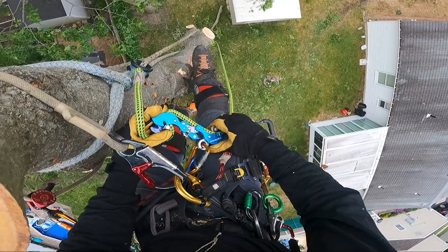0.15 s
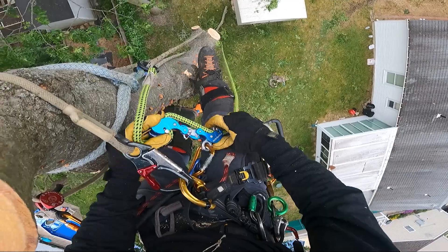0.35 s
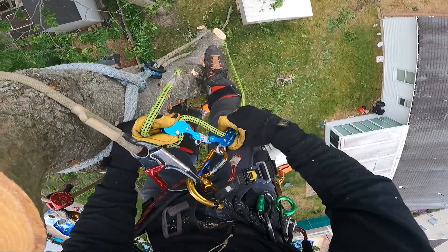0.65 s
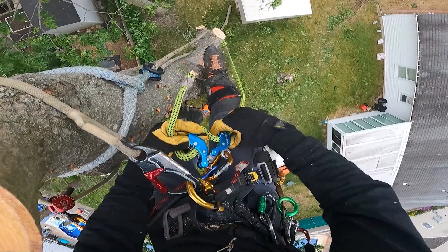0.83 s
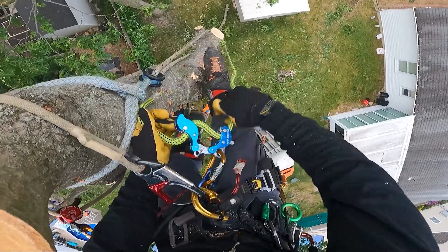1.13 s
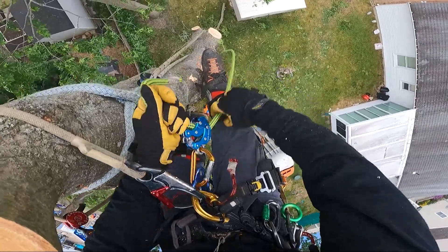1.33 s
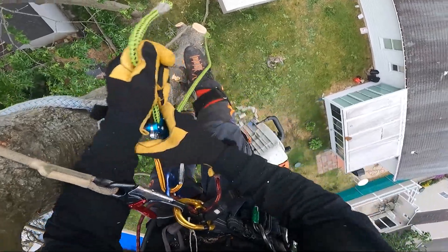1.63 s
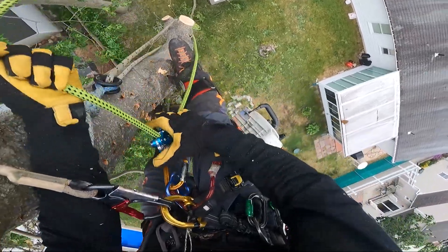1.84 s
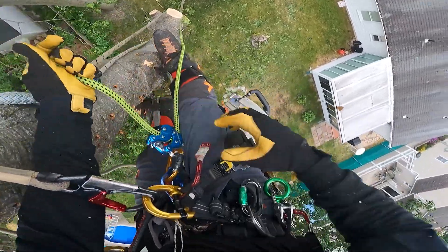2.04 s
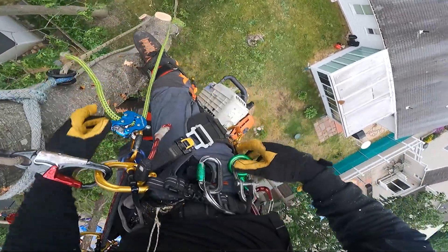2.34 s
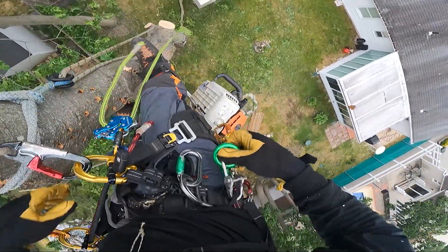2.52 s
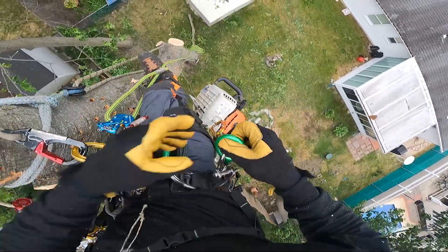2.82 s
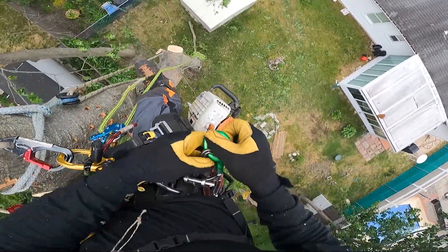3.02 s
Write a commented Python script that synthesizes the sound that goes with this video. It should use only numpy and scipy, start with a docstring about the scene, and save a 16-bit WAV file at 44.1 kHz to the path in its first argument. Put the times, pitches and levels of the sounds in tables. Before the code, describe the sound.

Metal climbing gear clicks and snaps, rope scrapes through, over distant engine roar and wind rumble.

```python
"""A metal rope device is handled high in a tree, snapped shut and has rope hauled through it; then
carabiners clink. Metal: coloured noise bursts plus decaying modes. Rope: grainy noise, rasp and hiss.
Behind: an engine on the ground (noise roar, firing and rotor tones) and wind rumble on the body-worn
microphone (low noise in gusts). A limiter ducks on loud treble."""
import sys
import numpy as np
from scipy import signal
from scipy.fft import rfft, irfft
from scipy.io import wavfile
from scipy.ndimage import uniform_filter1d

SR = 44100
rng = np.random.default_rng(int(sys.argv[2]) if len(sys.argv) > 2 else 0)


def persist_wave(psi):
    """Save psi, clipped to +-1, as 16-bit WAV."""
    counts = np.round(np.clip(psi, -1, 1) * 32767).astype(np.int16)
    wavfile.write(sys.argv[1], SR, np.atleast_2d(counts).T)


N = 139797
T = np.arange(N) / SR
LEAD_S = .05  # start of a metal sound's buffer to its peak
T_HIT = np.arange(SR // 4) / SR - LEAD_S
STRIKE_SPREAD_DB = 2.5  # the place struck varies each mode from hit to hit


def amp(db):
    """Decibels to gain."""
    return 10 ** (np.asarray(db) / 20)


def unit(x):
    """Scales to rms 1."""
    return x / np.sqrt(np.mean(x ** 2) + 1e-20)


def curve(rows):
    """Second column of a time table, interpolated at every sample."""
    rows = np.array(rows)
    return np.interp(T, rows[:, 0], rows[:, 1])


def colour(x, points, tilt_db_per_octave=0):
    """Filters by a spectrum, tilted about its peak (held from one octave below it down); rms 1."""
    f_hz, db = np.transpose(points)
    octave = np.log2(np.fft.rfftfreq(len(x), 1 / SR) + 1)
    from_peak = np.maximum(octave - np.log2(f_hz[np.argmax(db)]), -1)
    gain_db = np.interp(octave, np.log2(f_hz + 1), db) + tilt_db_per_octave * from_peak
    return unit(irfft(rfft(x) * amp(gain_db), len(x)))


def lowpass(x, hz):
    """Smooth split: what lies below hz."""
    return irfft(rfft(x) / (1 + (np.fft.rfftfreq(N, 1 / SR) / hz) ** 4), N)


def highpass(x, hz):
    """Smooth split: what lies above hz."""
    return x - lowpass(x, hz)


def drift(hz):
    """Slow random wander below hz, rms 1."""
    return unit(lowpass(rng.standard_normal(N), hz))


def add(mix, peak_s, sound):
    """Mixes in a metal sound, its peak at peak_s."""
    part = mix[max(round((peak_s - LEAD_S) * SR), 0):][:len(sound)]
    part += sound[:len(part)]


def mic_hiss(level_db=-70):
    """Faint self-noise of the microphones: steady coloured noise."""
    # hiss spectrum: f/Hz, level/dB
    hiss_spectrum = [(100, -13), (2000, -4.5), (4500, 13), (8000, -4), (12800, -12), (14000, -22),
                     (16000, -36)]
    return amp(level_db) * colour(rng.standard_normal(N), hiss_spectrum)


def wind(lump_db=2, lump_hz=14):
    """Lumpy buffeting on the microphone: low noise, randomly modulated, in gusts."""
    # buffeting spectrum: f/Hz, level/dB
    wind_spectrum = [(10, -8), (25, 0.5), (50, 2.5), (80, 2.5), (120, -2), (200, -6.5), (400, -28.5),
                     (1200, -71)]
    # gust level: t/s, level/dB
    gusts = [(.06, -26), (.16, -19.5), (.28, -24), (.44, -22), (.7, -22), (.9, -29.5), (1.08, -21),
             (1.45, -27.5), (1.9, -36.5), (2.3, -31), (2.52, -24), (2.65, -17), (2.9, -20.5), (3.17, -22)]
    rumble = colour(rng.standard_normal(N), wind_spectrum)
    return amp(curve(gusts)) * unit(rumble * amp(lump_db * drift(lump_hz)))


def tone(hz, flutter_db=2, flutter_hz=4):
    """One engine line of rms 1, fluttering on its way through the air."""
    flutter = unit(amp(flutter_db * drift(flutter_hz)))
    cycles = np.cumsum(hz) / SR + rng.random()
    return np.sqrt(2) * flutter * np.sin(2 * np.pi * cycles)


def roar(swell_db=0.61, swell_hz=25):
    """Broadband engine noise, crossfading between two spectra as the climber turns."""
    # roar spectrum: f/Hz, level before turn/dB, level after turn/dB
    roar_spectra = [(60, -17, -1.5), (106, -2.5, -1), (220, -2.5, -2.5), (424, -5.5, -3.5),
                    (500, -6.5, -11), (645, -8.5, -4), (856, -9.5, -9.5), (1016, -6.5, -9.5),
                    (1270, -15, -14.5), (1290, -13, -14), (2174, -14.5, -19.5), (2600, -23.5, -26.5),
                    (3380, -25, -34.5), (3670, -37, -32), (6700, -38, -38.5), (8650, -48, -45.5),
                    (10700, -62, -56), (15000, -79, -70)]
    # roar level: t/s, level/dB
    roar_level = [(.06, -23), (.6, -22), (1.1, -22), (1.5, -22.5), (1.9, -21.5), (2.4, -25.5), (2.7, -23),
                  (3.17, -23.5)]
    # climber's turn: start t/s, end t/s
    turn_s = (0.68, 1.68)
    turned = np.interp(T, turn_s, (0, 1))
    noise = rng.standard_normal(N)
    before = colour(noise, [(hz, db) for hz, db, _ in roar_spectra])
    after = colour(noise, [(hz, db) for hz, _, db in roar_spectra])
    return (before + turned * (after - before)) * amp(curve(roar_level) + swell_db * drift(swell_hz))


def firing(rate_hz=35.77, waver_share=0.00327, waver_hz=4.9):
    """Engine firing: multiples of one wavering rate."""
    # firing tones, before the level curve: multiple of rate, level/dB rms
    firing_orders = [(2, -30.5), (4, -37), (5, -40.5), (6, -31.5), (7, -36.5), (8, -41.5), (10, -41.5),
                     (11, -44), (25, -49), (49, -50.5)]
    # gain on all firing tones: t/s, level/dB
    firing_level = [(.3, 0.5), (1.3, -.5), (1.9, 1.5), (2.35, -3.5), (2.75, -.5), (3.17, -2.5)]
    hz = rate_hz * (1 + waver_share * drift(waver_hz))
    return amp(curve(firing_level)) * sum(amp(db) * tone(k * hz) for k, db in firing_orders)


def rotor(pitch_hz=337.4, waver_share=0.0017, waver_hz=5.2):
    """Engine-driven rotor: wavering harmonics whose levels shift as the climber moves."""
    # times of the rotor levels: t/s
    rotor_times_s = (.6, 1.8, 2.45, 2.9)
    # rotor tones: multiple of pitch, then level/dB rms at each of those times
    rotor_orders = [(1, -30.5, -30, -33, -27.5), (2, -39.5, -31.5, -39.5, -39),
                    (3, -39, -42.5, -44.5, -42.5), (4, -39.5, -46.5, -51, -52)]
    hz = pitch_hz * (1 + waver_share * drift(waver_hz))
    return sum(amp(np.interp(T, rotor_times_s, dbs)) * tone(k * hz) for k, *dbs in rotor_orders)


def engine():
    """Distant engine: broadband roar, firing tones and rotor tones."""
    return roar() + firing() + rotor()


def burst(db, rise_s, fall_s, points, tilt_db_per_octave=0):
    """Brief scrape: coloured noise, exponential rise to the peak and fall after it."""
    rate = np.where(T_HIT < 0, T_HIT / max(rise_s, 1e-4), -T_HIT / max(fall_s, 1e-4))
    shape = np.exp(rate)
    noise = colour(shape * rng.standard_normal(len(T_HIT)), points, tilt_db_per_octave)
    return amp(db) * noise * np.sqrt(np.mean(shape ** 2))


def ringing(rise_s, modes, phase_cycles):
    """Sine modes that swell up to time zero and die away, each at its own t60."""
    ring = np.zeros(len(T_HIT))
    for (hz, db, t60_s), phase in zip(modes, phase_cycles):
        decay = amp(db - 60 * np.maximum(T_HIT, 0) / t60_s)
        ring += decay * np.sin(2 * np.pi * (hz * T_HIT + phase))
    return np.exp(np.minimum(T_HIT, 0) / max(rise_s, 1e-4)) * ring


def contact(db, scrape_s, rattle_s, ring_db, tilt_db_per_octave, clack, modes):
    """Metal scrapes up to a hit, rattles briefly and rings."""
    ring = ringing(scrape_s, modes, rng.random(len(modes)))
    scrape = burst(db, scrape_s, rattle_s, clack, tilt_db_per_octave)
    return scrape + amp(db + ring_db) * ring / np.sqrt(2)


def carabiners(detune_share=0.0043):
    """Carabiner clinks: short clack plus modes scaled to a ring pitch; a hand on it shifts each a little."""
    # contacts: t/s, level/dB, scrape/s, rattle/s, ring re level/dB, tilt/(dB/octave), ring pitch f/Hz
    clinks = [(2.510, -43, .002, .004, -21, -3, 8560), (2.570, -33, .002, .004, -10, 2, 8560),
              (2.6245, -29.5, 0.0013, .002, -21.5, 6.5, 8560), (2.650, -35, .004, .003, -16, 1, 7980),
              (2.660, -30, .002, .003, -20, -1, 7980), (2.713, -28.5, .0015, .003, -22, -1, 7980),
              (2.800, -43, .002, .003, -16, -2, 7980), (2.815, -30.5, .001, .003, -22, 0, 7980),
              (2.940, -38, .001, .003, -4, -1, 7980), (2.972, -30, .002, .002, -4, -2, 7800),
              (2.977, -25.5, .001, .002, -0.5, 2, 7980), (2.9855, -28.5, 0.0027, .004, -2, 4, 7980),
              (3.046, -29.5, .0007, .002, -14, 0, 7600), (3.0775, -27, .0005, .0012, -22, -3, 7980),
              (3.083, -28, .0005, .002, -14, -2, 7980), (3.094, -27, .0005, .0012, -19, -2, 7800),
              (3.1025, -27.5, .0005, .0012, -22, -1, 7980)]
    # ring modes: share of ring pitch, level/dB, t60/s
    clink_modes = [(.49, -12, .025), (.576, -16, .03), (.743, -3, 0.038), (.86, -11, .03), (.945, -4, .025),
                   (1, 0.5, 0.093), (1.014, -9, .04), (1.19, -9, .028), (1.49, -20, .04),
                   (1.535, -22, .035)]
    # clack spectrum: f/Hz, level/dB
    clink_clack = [(500, -20), (2000, 0.5), (4000, 8.5), (6500, -2.5), (9000, -11.5), (12000, -22.5),
                   (16000, -38)]
    out = np.zeros(N)
    for s, *hit, pitch_hz in clinks:
        modes = []
        for share, db, t60_s in clink_modes:
            hz = share * pitch_hz * (1 + detune_share * rng.normal())
            modes.append((hz, db + STRIKE_SPREAD_DB * rng.normal(), t60_s))
        add(out, s, contact(*hit, clink_clack, modes))
    return out


def friction(fibres_per_s=2500, spread_db=3, fibre_share=0.46):
    """Fibres catch and let go: random impulses (by power share) over a smooth noise rub."""
    slipping = rng.random(N) < fibres_per_s / SR
    size = amp(spread_db * np.minimum(rng.exponential(1, N), 4))
    slips = slipping * size * rng.choice([-1, 1], N)
    return np.sqrt(fibre_share) * unit(slips) + np.sqrt(1 - fibre_share) * rng.standard_normal(N)


def rope_rasp(catch_db=1.3, catch_hz=200):
    """Haul rasp: mid-band friction noise; the strands catch unevenly."""
    # rasp level: t/s, level/dB
    haul = [(1.74, -71), (1.79, -34), (1.825, -22), (1.86, -18.5), (1.93, -21), (2.0, -20.5), (2.08, -21.8),
            (2.16, -26), (2.25, -31), (2.42, -38.5)]
    # rasp spectrum: f/Hz, level/dB
    rasp_spectrum = [(200, -7.5), (520, -27), (700, -1), (830, -8.5), (980, -4), (1150, -7.5), (1400, -2),
                     (1580, -6), (1800, -3.5), (2050, -11), (2450, -11), (3000, -17.5), (5000, -62)]
    catch = unit(amp(catch_db * drift(catch_hz)))
    return amp(curve(haul)) * colour(friction(), rasp_spectrum) * catch


def rope_hiss(judder_db=0.8, judder_hz=140, bright_hz=6000, bright_db_per_db=1):
    """Juddering hiss of sheath and gloves: friction noise whose treble falls further as the level falls."""
    # hiss level: t/s, level/dB
    sheath = [(1.72, -42.5), (1.79, -38.5), (1.83, -29), (1.885, -27), (1.93, -28), (1.99, -25.5),
              (2.07, -29), (2.17, -32), (2.28, -38.5), (2.47, -43.5), (2.65, -44), (2.88, -42.5),
              (3.15, -40)]
    # hiss spectrum: f/Hz, level/dB
    sheath_spectrum = [(1200, -22), (2500, -12.5), (3300, -5), (4300, -2.5), (5300, -4), (6500, -11),
                       (8500, -18.5), (10500, -34), (13000, -34.5), (14500, -45), (16000, -62)]
    judder = amp(judder_db * drift(judder_hz))
    level_db = curve(sheath)
    hiss = colour(friction(), sheath_spectrum)
    dull = lowpass(hiss, bright_hz)
    treble = (hiss - dull) * amp(bright_db_per_db * (level_db - level_db.max()))
    return amp(level_db) * judder * (dull + treble)


def jostles():
    """Rope jostles the device: noise scrapes, spectrum scaled to a pitch."""
    # scrapes: t/s, level/dB, rise/s, fall/s, pitch f/Hz
    scrapes = [(1.886, -23.5, .004, .008, 4900), (1.969, -23, .0007, .002, 5000),
               (1.992, -22, .001, .002, 4900), (2.099, -18, .002, .003, 4200),
               (2.118, -28, .008, .012, 4300), (2.207, -29.5, .0044, .012, 4200),
               (2.351, -32.5, 0.01, 0.022, 4100)]
    # scrape spectrum: share of pitch, level/dB
    scrape_spectrum = [(.49, -28), (.88, -10), (1, 6.5), (1.085, 5), (1.17, -1), (1.29, -1.5), (1.51, -22),
                       (2.44, -46), (3.9, -55)]
    out = np.zeros(N)
    for s, *scrape, pitch_hz in scrapes:
        add(out, s, burst(*scrape, [(share * pitch_hz, db) for share, db in scrape_spectrum]))
    return out


def snaps():
    """Device snaps shut, later the gear snaps taut: short-lived modes, each with a burst of grit."""
    # grit: t/s, level/dB, scrape/s, rattle/s, tilt/(dB/octave)
    grit = [(1.3124, -5.5, 0.00014, 0.00061, 0), (1.7, -21, .0019, .0018, -1)]
    # grit spectrum: f/Hz, level/dB
    grit_spectrum = [(500, -34), (2000, -16), (3500, -1), (5800, -2), (9000, -9.5), (12000, -17),
                     (16000, -32)]
    # device shuts: t/s, level/dB, rise/s
    shut = (1.3125, -5, .0002)
    # shut modes: f/Hz, level/dB, t60/s
    shut_modes = [(3050, -2, 0.0056), (3480, 1, .006), (4060, 1, .006), (4750, -5, .004), (5600, -4, .004),
                  (6500, -4, .005), (8700, -9, .004), (10800, -12, 0.0065)]
    # gear goes taut: t/s, level/dB, rise/s
    taut = (1.7003, -24.5, .0013)
    # taut modes: f/Hz, level/dB, t60/s
    taut_modes = [(2150, 1, .012), (2650, -4, .008), (3020, 3, .018), (3480, -1, .011), (4870, -8, .012),
                  (5640, 3, 0.018), (6300, -8, .012), (7450, -11, .014), (8400, -10, .012),
                  (11300, -15, .014), (12700, -20, .012)]
    out = np.zeros(N)
    for s, *snap, tilt in grit:
        add(out, s, burst(*snap, grit_spectrum, tilt))
    s, db, rise_s = shut
    add(out, s, amp(db) * ringing(rise_s, shut_modes, np.zeros(len(shut_modes))))  # one blow: in phase
    s, db, rise_s = taut
    add(out, s, amp(db) * ringing(rise_s, taut_modes, rng.random(len(taut_modes))))
    return out


def favour(hz, favoured_hz, boost_db=7.5, reach_octaves=0.1):
    """Boost in dB of a mode near the pitch that the place struck favours."""
    return boost_db * np.exp(-(np.log2(hz / favoured_hz) / reach_octaves) ** 2)


def rope_device(detune_share=.012):
    """Handled device: clacks plus ringing plates; grip and place struck vary each mode per hit."""
    # contacts: t/s, level/dB, scrape/s, rattle/s, ring re level/dB, tilt/(dB/octave), favoured f/Hz
    device_hits = [(.8975, -38, .0034, .003, 0, -2, 4500), (.9075, -23.5, .0012, .0018, -3, -2, 4800),
                   (.9800, -22, .0014, 0.002, -5.5, 1, 5450), (1.051, -36, .001, .002, -18, 1, 5400),
                   (1.0862, -26, 0.0022, 0.0026, -1, 0, 4600), (1.115, -45, .003, .005, 4, -4, 4950),
                   (1.2205, -30.5, .001, 0.002, -1, -7, 5050), (1.248, -36.5, .0022, .003, -9, -2, 4900),
                   (1.298, -21, 0.0018, .0025, -13, 4, 4150), (1.3096, -21.5, 0.0059, 0.0022, -12, 0, 6300),
                   (1.317, -16.5, 0.0022, 0.0032, -14, 4, 3900), (1.327, -26, .0013, 0.0085, -10, -3, 4000),
                   (1.351, -27, .001, .0023, -8, -4, 5100), (1.365, -32.5, .001, .004, 1.5, -7, 5000)]
    # plate modes: f/Hz, level/dB, t60/s
    plate_modes = [(3930, -14, .025), (4240, -3, .025), (4680, 2, .025), (4930, -1.5, .04), (5140, -6, .07),
                   (5400, -7, .025), (5950, -14, .03), (6500, -16, .02), (7600, -13, .03),
                   (9720, -19, 0.049)]
    # clack spectrum: f/Hz, level/dB
    device_clack = [(300, -30), (1500, -25), (3000, -2), (4700, 5), (7000, -4), (9000, -15.5), (12000, -22),
                    (16000, -44)]
    out = np.zeros(N)
    for s, *hit, favoured_hz in device_hits:
        modes = []
        for hz, db, t60_s in plate_modes:
            mode_db = db + favour(hz, favoured_hz) + STRIKE_SPREAD_DB * rng.normal()
            modes.append((hz * (1 + detune_share * rng.normal()), mode_db, t60_s))
        add(out, s, contact(*hit, device_clack, modes))
    return out


def scene(side_db=-14, side_hz=6000, top_db=-3, top_hz=11000):
    """Nearly mono; only the treble of the close sounds and the microphones' hiss differ between ears."""
    near = carabiners() + rope_rasp() + rope_hiss() + jostles() + snaps() + rope_device()
    top = highpass(highpass(near, top_hz), top_hz)
    spread = amp(side_db) * highpass(near, side_hz) + amp(top_db) * top
    side = signal.hilbert(spread).imag + mic_hiss()  # spread turned by 90 degrees
    mid = near + engine() + wind()
    return np.array([mid + side, mid - side])


def record(dry, threshold_db=-12, recover_db_per_s=120, sense_hz=2500, bass_hz=450, bass_share=0.38,
           start_s=.057, edge_hz=15500):
    """Treble-sensing limiter: ducks at once, bass less, recovers linearly in dB; silent start, band limit."""
    power = abs(uniform_filter1d(highpass(dry.mean(0), sense_hz) ** 2, size=24))
    fall_db = T * recover_db_per_s
    held_db = np.maximum.accumulate(10 * np.log10(power + 1e-12) + fall_db) - fall_db
    duck_db = uniform_filter1d(np.maximum(held_db - threshold_db, 0), size=16)
    bass = lowpass(dry, bass_hz)
    out = (dry - bass) * amp(-duck_db) + bass * amp(-bass_share * duck_db)
    out = out * (T > start_s)
    band = signal.firwin(511, edge_hz, window=("kaiser", 9), fs=SR)
    return signal.oaconvolve(out, band[None], "same")


dry = scene()
out = record(dry)
persist_wave(out)
```